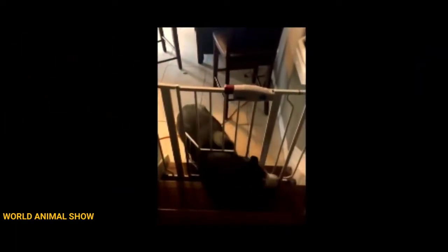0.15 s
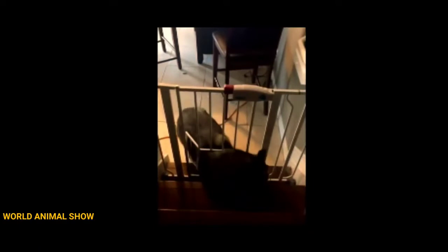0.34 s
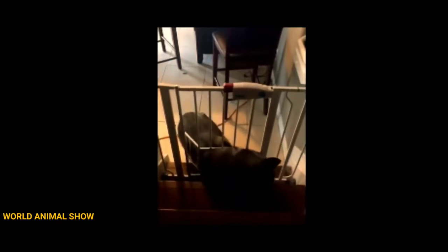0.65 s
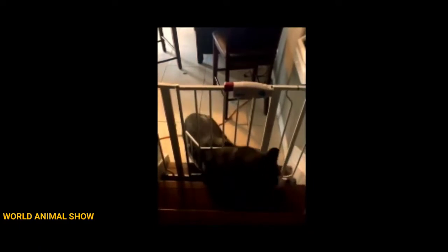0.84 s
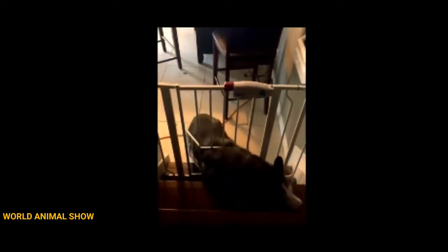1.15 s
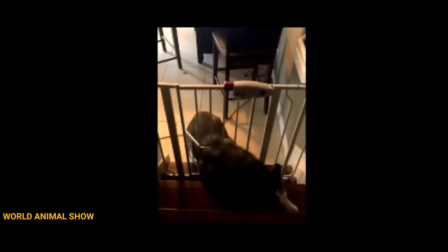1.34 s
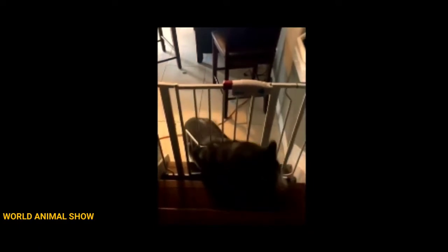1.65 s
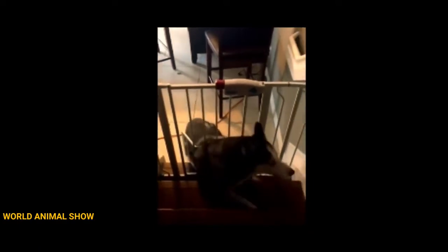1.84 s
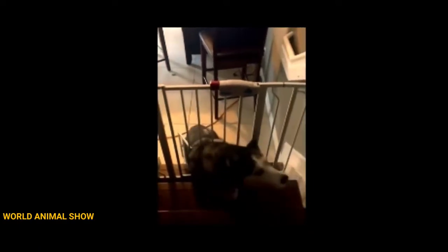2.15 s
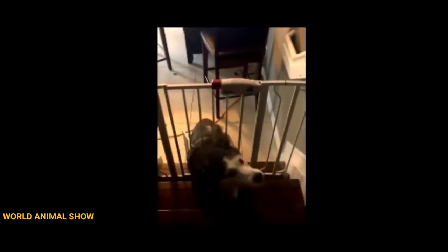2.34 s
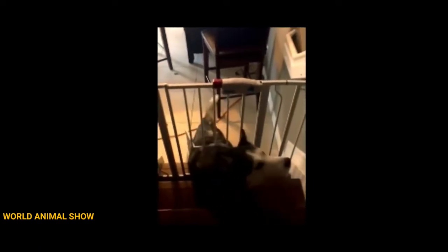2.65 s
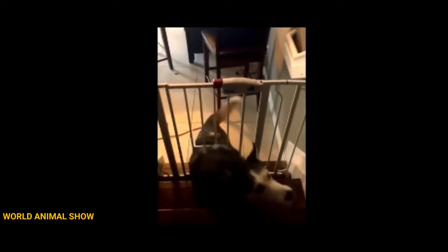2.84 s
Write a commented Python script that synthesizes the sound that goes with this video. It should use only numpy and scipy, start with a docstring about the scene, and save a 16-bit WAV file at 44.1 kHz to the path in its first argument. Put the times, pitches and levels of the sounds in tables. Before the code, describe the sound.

Irregular knocks and gritty scrapes come from a dog scrabbling at a metal gate close by in a quiet room. The clatter grows busier, with tiny squeaks, ending in a short judder, brushing fur and paws thumping on wood.

```python
"""Small room, wooden floor: a dog squeezes through a metal gate, pawing and scrabbling.
Claws and bars scrape and skid in gritty catches. The gate clacks, rings in its modes and
judders once, sticking and slipping in its hollow frame. Friction makes tight joints chirp
and metal squeal. Paws and body thud on the boards, the floor rumbles under the shifting
weight, and the coat brushes along the bars."""
import sys
import numpy as np
from scipy import signal
from scipy.fft import rfft, irfft
from scipy.io import wavfile

SR = 44100
rng = np.random.default_rng(int(sys.argv[2]) if len(sys.argv) > 2 else 0)


def unload_audio(sound):
    """Save the sound as a 16-bit wav file, at the path given as the first command line argument."""
    columns = np.transpose(np.atleast_2d(sound))
    # keep every value between -1 and 1, then stretch to whole-number steps
    steps = np.round(np.clip(columns, -1, 1) * 32767)
    wavfile.write(sys.argv[1], SR, steps.astype(np.int16))


N = 132300
T = np.arange(N) / SR
SHORT = T[:SR // 2]  # time axis of one event
HIT_S = 0.012  # reference length for impact levels
TOP_HZ = 15650


def undb(db):
    """Decibels to gain."""
    return 10 ** (np.asarray(db) / 20)


def band(x, lo_hz, hi_hz):
    """Causal band-pass."""
    sos = signal.butter(2, [lo_hz, min(hi_hz, SR / 2 - 100)], "band", fs=SR, output="sos")
    return signal.sosfilt(sos, x + 1e-18)


def sized(x, db, length_s):
    """Give a burst the energy of length_s at this level."""
    return x * undb(db) * np.sqrt(length_s * SR / np.sum(x ** 2))


def add(out, start_s, x):
    """Mix a short sound in at start_s."""
    i = max(int(start_s * SR), 0)
    out[i:i + len(x)] += x[:N - i]


def noise(spectrum):
    """Unit noise shaped by (frequency [Hz], density [dB]) points."""
    hz, db = np.array(spectrum).T
    gain = undb(np.interp(np.log(np.fft.rfftfreq(N, 1 / SR) + 1), np.log(hz), db))
    x = irfft(rfft(rng.standard_normal(N)) * gain, N)
    return x / x.std()


def walk(rate_hz):
    """Random wander, spread near 1."""
    return np.interp(T * rate_hz, np.arange(N), rng.standard_normal(N))


def stroke(length_s, attack_s=0.0012, release_s=0.0068):
    """Envelope of a sliding contact."""
    return (1 - np.exp(-SHORT / attack_s)) * np.exp(-np.maximum(SHORT - length_s, 0) / release_s)


def coloured(force, levels_db, length_s):
    """A contact force with its own level in each band."""
    # body, clack, click and edge bands (low [Hz], high [Hz])
    bands = [(190, 554), (750, 2890), (3200, 6950), (7500, 12500)]
    return sum((-1) ** k * sized(band(force, *edges_hz), db, length_s)
               for k, (edges_hz, db) in enumerate(zip(bands, levels_db)))


def ringing(force, modes, ring_db):
    """A contact plus the modes it excites."""
    ring = sum(undb(db - 60 * SHORT / t60_s) * np.cos(2 * np.pi * hz * SHORT) for hz, db, t60_s in modes)
    return force + undb(ring_db) * signal.fftconvolve(force, ring)[:len(force)]


def catches(length_s, rate_per_s, spread_db=1.5, bunch_db=3, sag_db=3):
    """Random catches of a sliding contact; their force bunches and eases off."""
    size, sign = rng.standard_normal((2, len(SHORT)))
    progress = np.minimum(SHORT / length_s, 1)
    force_db = spread_db * size + bunch_db * walk(237)[:len(SHORT)] - sag_db * progress
    caught = rng.random(len(SHORT)) < rate_per_s / SR
    return caught * np.sign(sign) * undb(force_db) * stroke(length_s)


def scrapes():
    """Claws and bars slide over each other in dense, gritty catches."""
    # slides (time [s], length [s], body [dB], clack [dB], click [dB], edge [dB])
    slides = [(0, 0.013, -36, -49, -43, -42), (0.157, 0.063, -44, -51.5, -44.5, -43.5),
              (0.171, 0.0066, -54, -36.5, -32, -38), (0.275, 0.0097, -61, -51, -42.5, -40),
              (0.438, 0.0077, -37, -32, -31, -27), (0.554, 0.045, -71, -38, -49, -45),
              (0.674, 0.027, -65, -41.5, -43.5, -49), (.724, 0.038, -37, -29, -35.5, -30.5),
              (0.957, 0.044, -33.5, -39.5, -50, -47.5), (1.241, .005, -29, -32, -37, -44),
              (1.263, 0.043, -37, -31.5, -39, -50), (1.431, 0.011, -77, -42, -31.5, -37.5),
              (1.591, 0.011, -55, -41, -33, -27.5), (1.691, 0.01, -29, -25, -25, -24.5),
              (1.707, 0.026, -31.5, -34.5, -29.5, -34.5), (1.827, 0.012, -42.5, -48, -34.5, -31.5),
              (1.973, 0.013, -25, -32, -26, -23), (2.002, 0.024, -34, -35, -32, -27),
              (2.043, .02, -23, -33, -38, -38), (2.248, 0.02, -35.5, -35.5, -35, -41.5),
              (2.446, 0.025, -34.5, -30.5, -37, -40.5), (2.657, 0.025, -36, -27.5, -43, -39.5)]
    out = np.zeros(N)
    for start_s, length_s, *levels_db in slides:
        add(out, start_s, coloured(catches(length_s, rate_per_s=3400), levels_db, length_s))
    return out


def gate(force, low_hz=175, shimmer_db=9):
    """Contacts ring the gate and, in two stretches, shake out a thin, high shimmer."""
    # gate modes (frequency [Hz], level [dB], t60 [s])
    modes = [(409.8, -8.5, 0.19), (986.6, -1, 0.16), (1104, -6.5, 0.32), (1543, -2, 0.14),
             (1960, -1.5, 0.092), (2300, -7, 0.091), (2740, -7, 0.2)]
    # shimmer stretches (start [s], end [s])
    stretches = [(0, .4), (1.48, 2.04)]
    contacts = band(force, low_hz, SR / 2)  # light bars radiate little bass
    loose = sum((T >= start_s) & (T < end_s) for start_s, end_s in stretches)
    shimmer = undb(shimmer_db) * band(loose * contacts, 13500, 15000)
    return ringing(contacts, modes, ring_db=-50.5) + shimmer


def coat(flutter_db=4):
    """Fur brushes along the bars: fluttering noise."""
    # brushing envelope (time [s], level [dB])
    envelope = [(0, -58), (.1, -48), (.22, -54), (.4, -55.5), (.6, -43), (.95, -48.5), (1.41, -42),
                (1.5, -41.5), (1.6, -37), (1.8, -50.5), (2.33, -39.5), (2.55, -37), (2.7, -39), (2.8, -61)]
    # fur on metal (frequency [Hz], density [dB])
    spectrum = [(100, 6.5), (300, 4.5), (900, -4), (2600, -0.5), (5000, -7.5), (9000, -14.5), (15000, -28)]
    level_db = np.interp(T, *np.array(envelope).T)
    return noise(spectrum) * undb(level_db + flutter_db * (walk(45) + walk(700) / 2))


def rumble():
    """The floor rumbles under the shifting weight."""
    # rumble envelope (time [s], level [dB])
    envelope = [(0, -56), (.75, -44.5), (1.05, -35), (1.25, -60), (1.9, -53), (2.7, -40), (3, -55)]
    # floorboards (frequency [Hz], density [dB])
    spectrum = [(30, -4), (62, 4.5), (100, 10), (155, 5), (260, -4.5), (600, -36)]
    return noise(spectrum) * undb(np.interp(T, *np.array(envelope).T))


def air(level_db=-65.5):
    """Faint, steady hiss of the room."""
    # room air (frequency [Hz], density [dB])
    spectrum = [(150, -22), (700, -20), (11000, -5), (15000, -40)]
    return undb(level_db) * noise(spectrum)


def squeaks(events, partials, wander, hiss_db, rasp_hz=261.8, rasp_depth=0.48, flicker_db=4):
    """Friction drives high, unsteady partials in rapid slips; each squeak has its own tilt."""
    out = np.zeros(N)
    slip_hz = rasp_hz * (1 + 0.306 * walk(100))
    slips = 1 + rasp_depth * np.sin(2 * np.pi * np.cumsum(slip_hz) / SR)
    tones = []
    for hz, db in partials:
        gain = undb(db + flicker_db * walk(100))
        pitch_hz = hz * (1 + wander * walk(1800))
        tones.append(gain * np.sin(2 * np.pi * np.cumsum(pitch_hz) / SR))
    hiss = undb(hiss_db) * band(rng.standard_normal(N), 2200, TOP_HZ)
    for start_s, length_s, db, tilt_db in events:
        effort = np.zeros(N)
        add(effort, start_s, undb(db) * stroke(length_s))
        tone = sum(undb(k * tilt_db) * partial for k, partial in enumerate(tones))
        out += effort * slips * (tone / tone.std() + hiss)
    return out


def chirps():
    """A tight joint slips in rasping chirps."""
    # chirps (time [s], length [s], level [dB], tilt [dB/partial])
    events = [(.134, 0.014, -37, 4), (.412, 0.009, -22, -3), (1.872, 0.037, -38, 6),
              (1.9525, 0.0052, -26, 1.5)]
    # joint partials (frequency [Hz], level [dB])
    partials = [(5250, -0.5), (9400, -4), (14100, -5)]
    return squeaks(events, partials, wander=0.022, hiss_db=-3.5)


def thuds(rush_db=-6.5, attack_s=0.001, cutoff_ratio=2.6):
    """Paws and body strike the floor: a damped low swing and dull rush, rounded off by the pads."""
    # blows (time [s], pitch [Hz], level [dB], t60 [s])
    blows = [(0.2398, 400, -18.5, 0.012), (.269, 330, -30.5, 0.014), (.331, 273, -29.5, 0.053),
             (0.355, 245, -33, 0.039), (.387, 638, -33.5, 0.034), (0.533, 142, -34, 0.052),
             (.749, 170, -19, 0.097), (.976, 183, -25, 0.1), (0.996, 102, -25, 0.2),
             (1.2455, 246, -15, 0.033), (1.294, 290, -27, 0.049), (2.059, 269.3, -22.5, 0.088),
             (2.085, 237, -22.5, 0.059), (2.09, 105, -22, 0.19), (2.148, 157.6, -26, 0.17),
             (2.399, 154.4, -21.5, 0.061), (2.501, 251, -28, 0.075), (2.557, 135, -26.5, 0.066),
             (2.607, 63, -24.5, 0.32), (2.653, 150.6, -25, 0.25), (2.839, 153, -39, 0.072),
             (2.886, 160, -34, 0.14)]
    # wooden floor modes (frequency [Hz], level [dB], t60 [s])
    modes = [(61.4, -13.5, 0.34), (153.5, -2.5, 0.34), (233.5, 0, 0.15), (299, -9.5, 0.12)]
    out = np.zeros(N)
    for start_s, hz, db, t60_s in blows:
        rush = band(rng.standard_normal(len(SHORT)), hz / 2, hz * 2)
        swing = np.sin(2 * np.pi * hz * SHORT) + undb(rush_db) * rush / rush.std()
        blow = swing * undb(-60 * SHORT / t60_s) * (1 - np.exp(-SHORT / attack_s))
        add(out, start_s, sized(band(blow, hz / 3, hz * cutoff_ratio), db, HIT_S))
    return ringing(out, modes, ring_db=-57)


def knocks(snap_db=8, crack_s=0.00059, clatter_s=0.0105, clatter_db=-2.5):
    """Hard knocks on the gate: a snap, a sharp crack and a brief clatter of loose parts."""
    # hits (time [s], body [dB], clack [dB], click [dB], edge [dB])
    hits = [(.332, -36, -46, -44.5, -43.5), (.537, -38.5, -30, -27.5, -37), (.755, -23, -29, -54, -41),
            (0.918, -36.5, -39, -52, -60), (1.098, -70, -35.5, -61, -58), (1.114, -66, -38.5, -41.5, -44.5),
            (1.2482, -28, -18.5, -22.5, -29), (1.2525, -28.5, -22, -38, -37), (1.516, -42, -31, -23.5, -46),
            (1.526, -39, -40, -33, -40), (1.5636, -32, -24.5, -40, -41), (1.605, -31.5, -36, -28.5, -33),
            (1.675, -56, -30.5, -36, -32), (1.8041, -62, -48, -32.5, -35.5), (1.867, -35, -25, -29, -41),
            (2.014, -27.5, -32, -22.5, -27), (2.1493, -38, -31.5, -36.5, -46),
            (2.214, -42, -38.5, -31, -29), (2.576, -56, -63, -33.5, -40)]
    out = np.zeros(N)
    envelope = np.exp(-SHORT / crack_s) + undb(clatter_db) * np.exp(-SHORT / clatter_s)
    for start_s, *levels_db in hits:
        force = envelope * rng.standard_normal(len(SHORT)) + undb(snap_db) * (SHORT == 0)
        add(out, start_s, coloured(force, levels_db, HIT_S))
    return out


def squeals():
    """Metal rubs on metal in thin squeals."""
    # squeals (time [s], length [s], level [dB], tilt [dB/partial])
    events = [(.452, 0.035, -35.5, 10), (.59, 0.06, -37.5, 3), (.645, 0.025, -33.5, -5),
              (.74, .05, -42, 12), (2.711, 0.009, -27.5, 0)]
    # metal partials (frequency [Hz], level [dB])
    partials = [(8380, -0.81), (12050, -0.19)]
    return squeaks(events, partials, wander=0.0211, hiss_db=-12)


def skids(overtone_ratio=2.57, sag_per_s=6, width_hz=1000):
    """A claw or bar grates: catches ring a resonance and overtone that sink as the contact moves."""
    # skids (time [s], length [s], pitch [Hz], level [dB], overtone [dB])
    events = [(0.992, .01, 3280, -38, -30), (1.2517, .007, 2700, -16.5, -42), (1.978, .009, 5200, -25, -30),
              (1.987, 0.0047, 3400, -25, -36), (2.025, 0.0077, 4300, -23, -23),
              (2.033, 0.0065, 4680, -27, -31), (2.046, 0.006, 3440, -28, -30)]
    out = np.zeros(N)
    for start_s, length_s, hz, base_db, overtone_db in events:
        force = catches(length_s, rate_per_s=1500)
        turns = np.cumsum(hz * np.exp(-sag_per_s * SHORT)) / SR
        for ratio, db in ((1, base_db), (overtone_ratio, overtone_db)):
            carrier = np.exp(2j * np.pi * ratio * turns)
            lowpass = signal.butter(2, ratio * width_hz / 2, fs=SR)
            ring = carrier * signal.lfilter(*lowpass, force / carrier)  # gliding band-pass
            add(out, start_s, sized(ring.real, db, length_s))
    return out


def judder(start_s=2.3508, rate_hz=425.7, jitter=0.04, rise_s=0.0042, slip_s=0.0014, variety=0.5):
    """The gate sticks and slips in its hollow frame: an uneven train of cracks swells and dies."""
    # frame modes (frequency [Hz], level [dB], t60 [s])
    modes = [(426, 0, .055), (930, -1, .035), (2350, 3, .014)]
    # judder colour (body [dB], clack [dB], click [dB], edge [dB])
    levels_db = [-17, -18, -28, -26]
    out = np.zeros(N)
    n = len(SHORT)
    turns = np.cumsum(rate_hz * (1 + jitter * walk(300)[:n])) / SR
    swell = (SHORT / rise_s + 0.14) * np.exp(-SHORT / rise_s)
    slips = np.diff(np.floor(turns), prepend=-1) * swell
    shared, own = rng.standard_normal((2, n))
    fade = np.exp(-SHORT / slip_s)
    alike = signal.fftconvolve(slips, shared * fade)[:n]
    unlike = own * signal.fftconvolve(slips, fade)[:n]
    frame = ringing(alike + variety * unlike, modes, ring_db=-29)
    add(out, start_s, coloured(frame, levels_db, HIT_S))
    return out


def room(x, build_s=0.0064):
    """Direct sound plus diffuse reflections in octave bands."""
    # reverberation (frequency [Hz], t60 [s], level [dB])
    reverb = [(100, 0.43, -11), (350, 0.17, -2.5), (1030, 0.47, -7.5), (2460, 0.22, -3.5),
              (6000, 0.35, -10), (13000, 0.24, -4.5)]
    hz, t60_s, db = np.array(reverb).T
    onset = 1 - np.exp(-(SHORT / build_s) ** 2)
    tail = 0
    for lo_hz in 44 * 2. ** np.arange(9):
        log_centre = np.log(lo_hz * np.sqrt(2))
        fade = undb(-60 * SHORT / np.interp(log_centre, np.log(hz), t60_s))
        octave = band(rng.standard_normal(len(SHORT)), lo_hz, 2 * lo_hz) * fade * onset
        impulse_s = 2 * lo_hz / SR ** 2  # this octave's share of a unit impulse
        tail = tail + sized(octave, np.interp(log_centre, np.log(hz), db), impulse_s)
    return x + signal.fftconvolve(x, tail)[:N]


def scene(squeak_send=0.69, gain_db=-2.0):
    """All contacts sound in the room over its air; chirps and squeals come more directly."""
    bars = gate(knocks() + scrapes() + skids() + judder())
    squeaking = chirps() + squeals()
    dog = thuds() + coat() + rumble()
    mix = room(bars + dog + squeak_send * squeaking) + (1 - squeak_send) * squeaking
    return (undb(gain_db) * mix + air())[None]


def record(dry, low_hz=42):
    """Thin the deepest bass, cut the top."""
    thinned = signal.sosfilt(signal.butter(2, low_hz, "high", fs=SR, output="sos"), dry)
    return signal.sosfilt(signal.ellip(8, .2, 70, TOP_HZ, fs=SR, output="sos"), thinned)


dry = scene()
out = record(dry)
unload_audio(out)
```